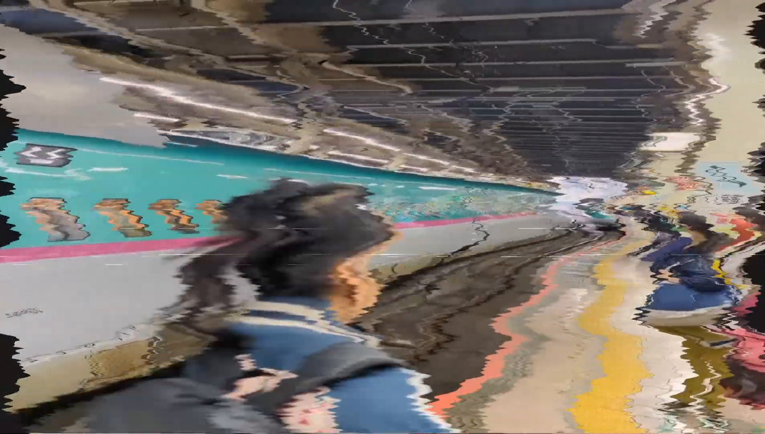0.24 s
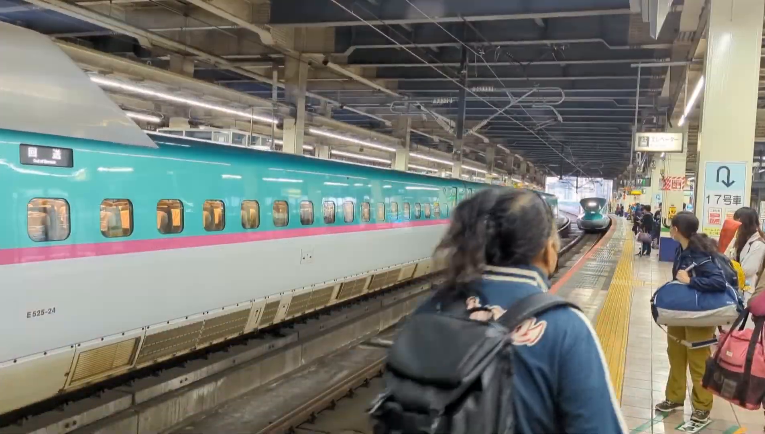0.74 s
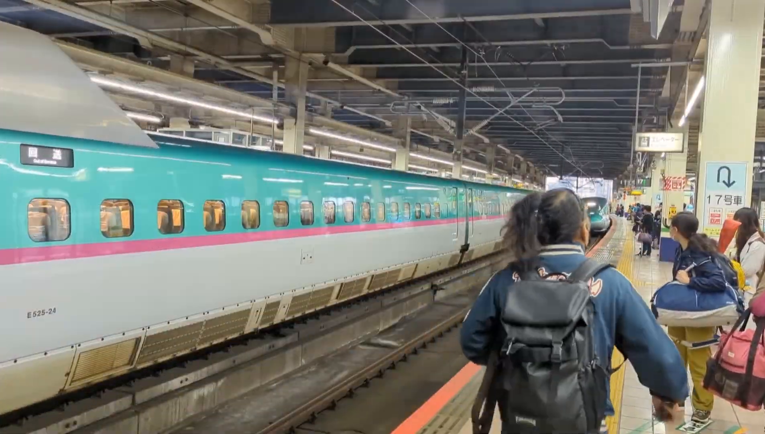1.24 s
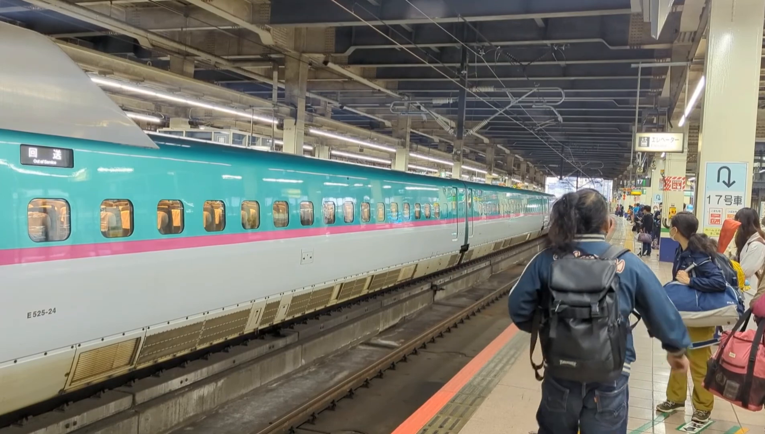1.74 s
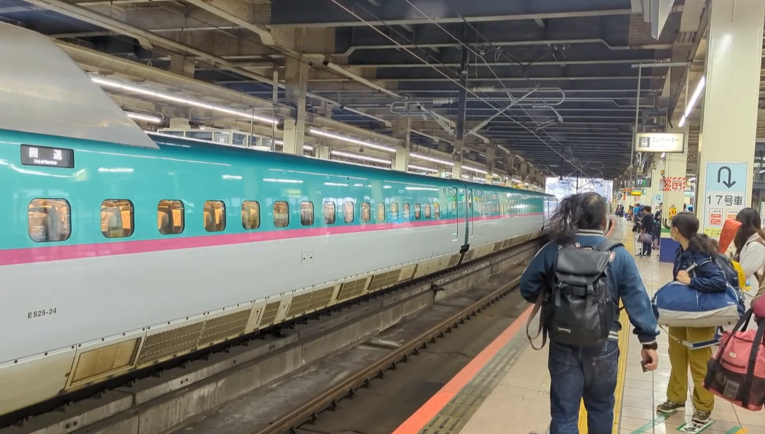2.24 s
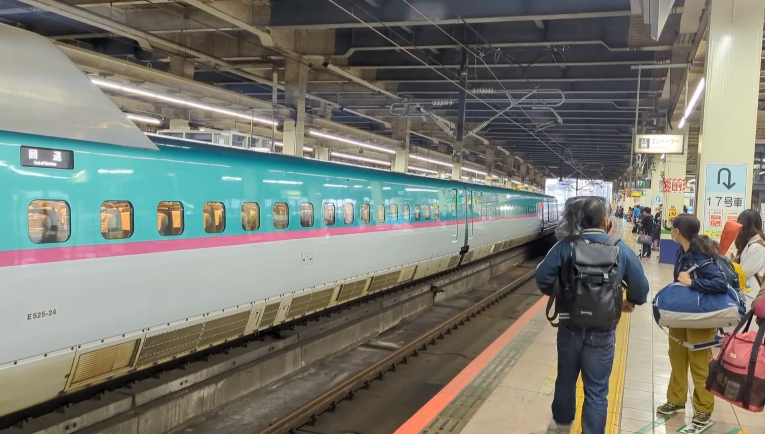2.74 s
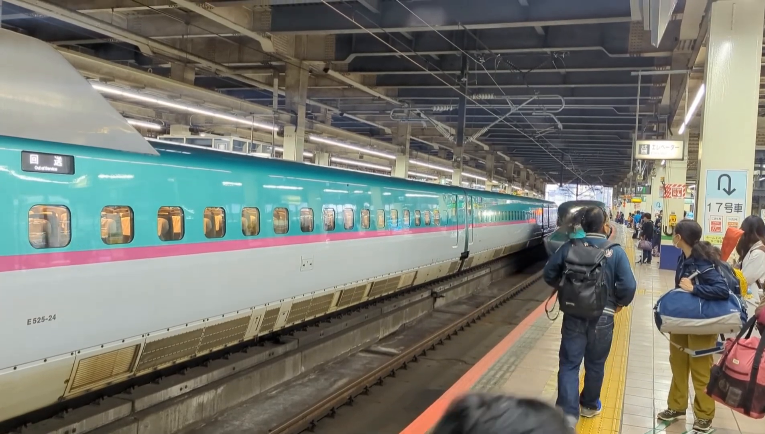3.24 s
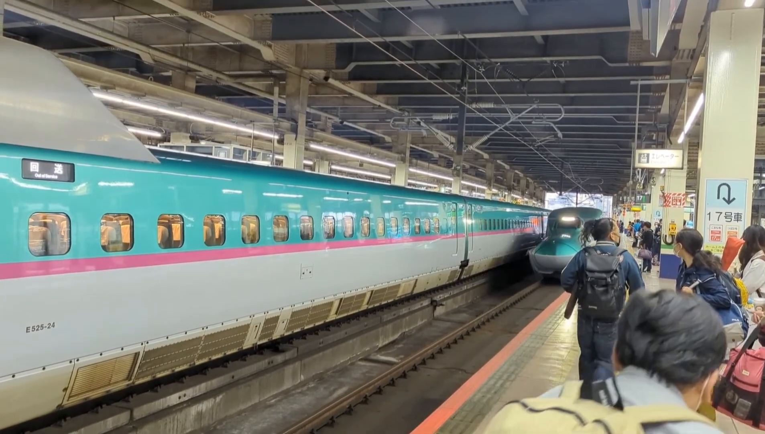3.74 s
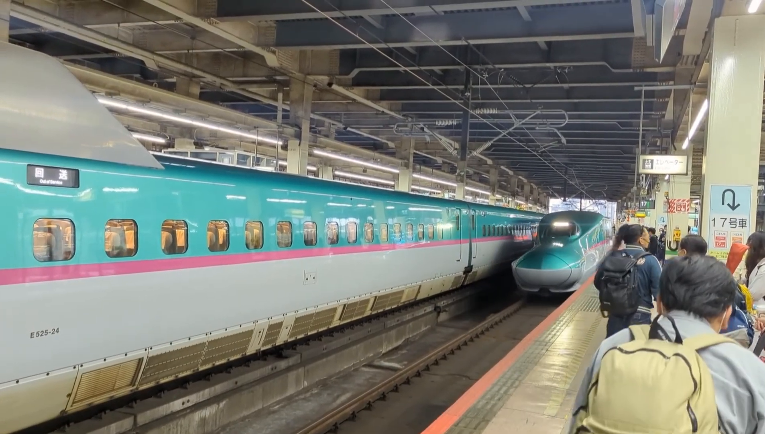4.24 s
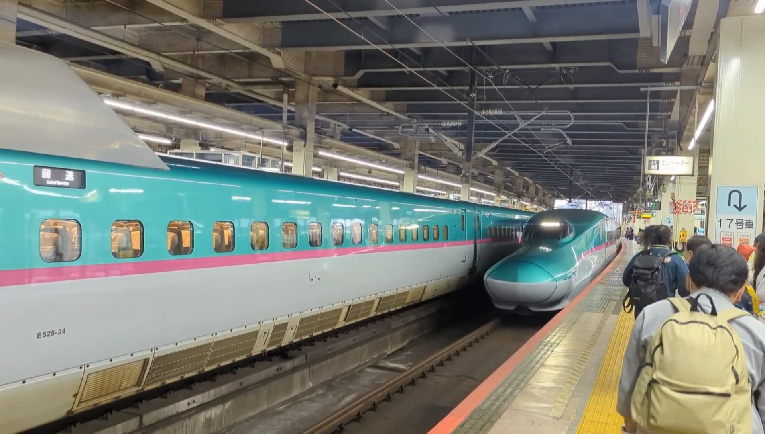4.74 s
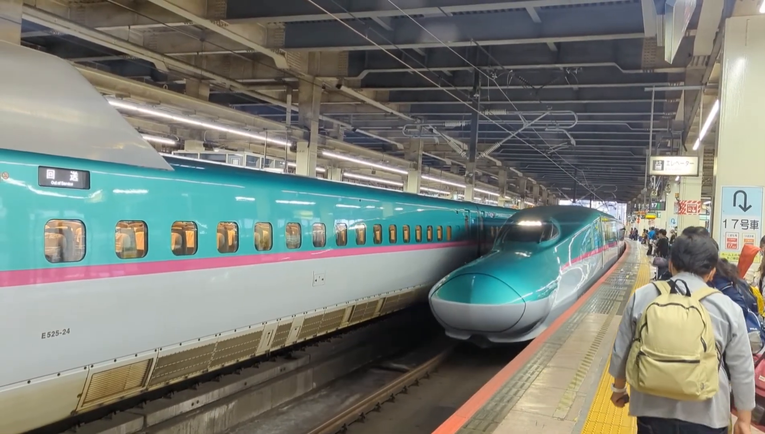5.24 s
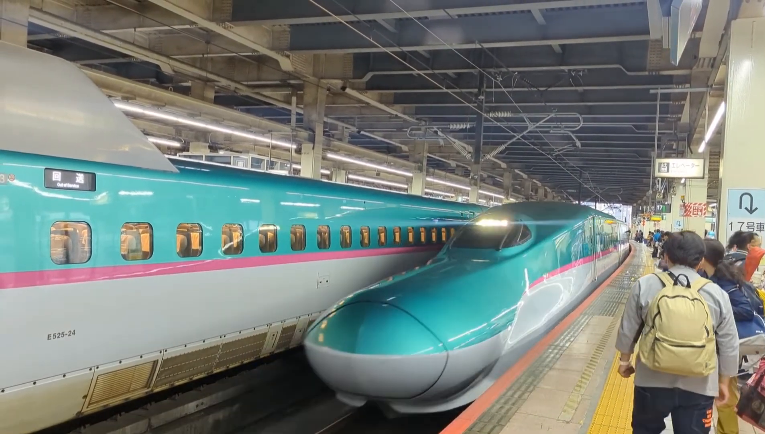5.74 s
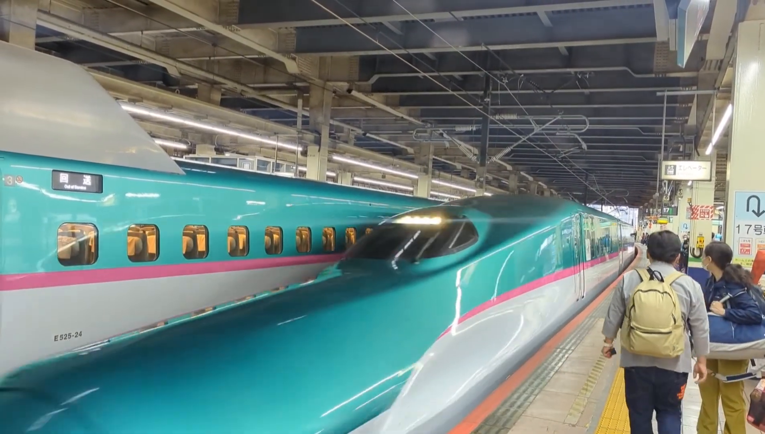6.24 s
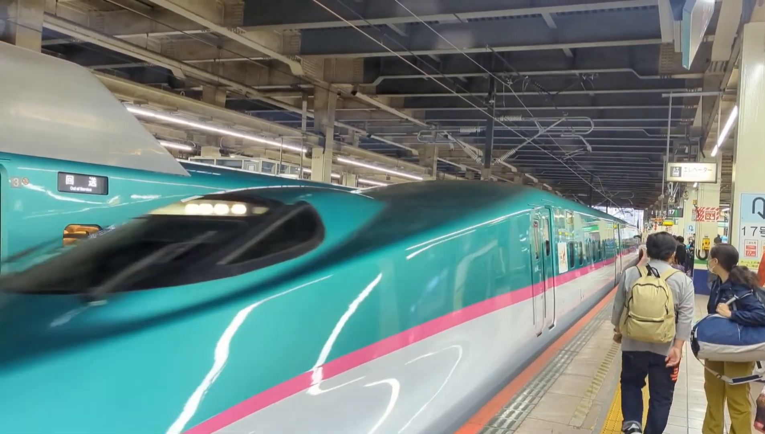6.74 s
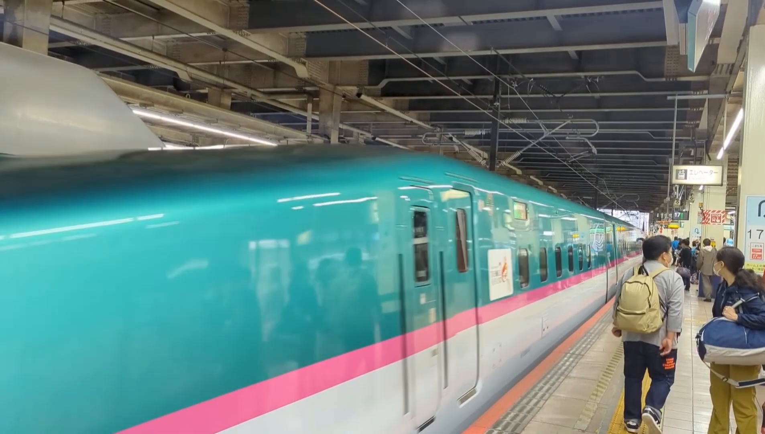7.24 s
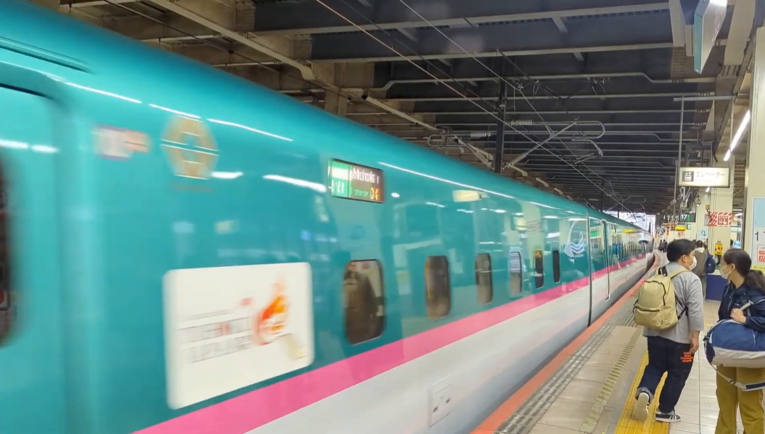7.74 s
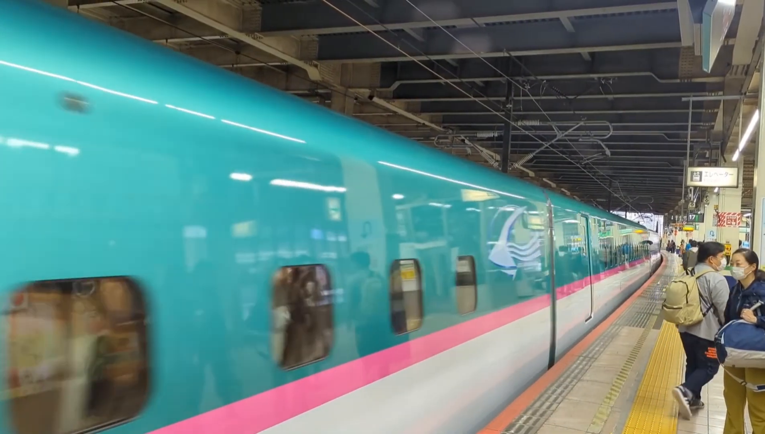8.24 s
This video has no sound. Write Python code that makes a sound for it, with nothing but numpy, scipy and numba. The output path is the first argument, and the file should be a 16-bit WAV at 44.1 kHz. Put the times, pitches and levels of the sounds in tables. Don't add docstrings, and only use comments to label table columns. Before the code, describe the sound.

Under a roofed station platform, low rumble and steady fan hum surround a faint high brake squeal. As an electric train approaches, the squeal grows into a piercing, rough shriek with glassy overtones, while a gear whine gradually sinks. A knock sounds early on. The rumble ducks under the squeal, air hiss rises, and the pitch drops slightly as the nose passes close to the stereo microphones.

```python
import sys
import numpy as np
from scipy import signal
from scipy.io import wavfile
from scipy.ndimage import uniform_filter1d, minimum_filter1d
from numba import njit

SR = 44100
rng = np.random.default_rng(int(sys.argv[2]) if len(sys.argv) > 2 else 0)


def to_wav(sig):
    pcm = np.clip(np.atleast_2d(sig), -1, 1) * 32767
    pcm = np.round(pcm).astype(np.int16)
    wavfile.write(sys.argv[1], SR, pcm.T)


def boost(x):
    u = np.asarray(x, float) / 20
    return 10 ** u


N = 374409
TIME = np.arange(N) / SR
STEADY = slice(SR, 3 * SR)
FULL_EFFORT_DB = -14


@njit
def svf(x, hz, width, order):
    y, band, low = np.empty(len(x)), np.zeros(order), np.zeros(order)
    g, k, h = 0., 0., 0.
    for i in range(len(x)):
        if i % 16 == 0:
            g = np.tan(np.pi * hz[i] / SR)
            k = width[i] / hz[i]
            h = 1 / (1 + g * (g + k))
        u = x[i]
        for j in range(order):
            v = (band[j] + g * (u - low[j])) * h
            band[j] = 2 * v - band[j]
            low[j] += 2 * g * v
            u = k * v
        y[i] = u
    return y


def curves(table):
    s, *columns = np.transpose(table)
    return [np.interp(TIME, s, column) for column in columns]


def step(s, spread):
    return 1 / (1 + np.exp((s - TIME) / spread))


def walk(rate):
    hold = int(SR / rate)
    levels = np.repeat(rng.standard_normal(N // hold + 1), hold)
    return 1.55 * uniform_filter1d(uniform_filter1d(levels, hold), hold)[:N]


def ring(hz, width, order):
    hz, width = hz + 0 * TIME, np.maximum(width + 0 * TIME, 2)
    y = svf(rng.standard_normal(N), hz, width, order) / np.sqrt(width)
    return y / np.std(y)


def likeness(hz):
    # frequency in Hz, left-right correlation.
    coherence = np.array([(60, 1), (130, 0.97), (290, 0.94), (640, 0.54), (1410, -0.13), (3100, -0.026),
                          (6820, 0.031), (15000, 0.19)])
    return np.interp(np.log(hz), np.log(coherence[:, 0]), coherence[:, 1])


def pair(hz, width, pan_db, like, order=2):
    like = np.clip(like, -.99, .995)
    mid = np.sqrt((1 + like) / 2) * ring(hz, width, order)
    side = np.sqrt((1 - like) / 2) * ring(hz, width, order)
    return np.array([(mid + side) * boost(pan_db / 2), (mid - side) * boost(-pan_db / 2)])


def effort():
    # time in s, main squeal in dB.
    braking = [(0, -39.5), (.25, -38), (.55, -31.5), (1.2, -29), (1.6, -25.5), (2, -22), (2.6, -19),
               (3.2, -18.5), (3.8, -15.5), (4.3, -13), (5.5, -14.5), (6.7, -13.5), (7.4, -14.5),
               (7.8, -13.5), (8.3, -14.5), (8.49, -16.5)]
    return curves(braking)[0] - FULL_EFFORT_DB


def brakes():
    # ratio to main squeal, core width in Hz, skirt centre in Hz, skirt width in Hz,
    # skirt level in dB, left bias in dB.
    disc_modes = [
        (1., 312, 6200, 790, -3, 0),
        (.501, 186, 3072, 890, -2, 5.5),
        (1.507, 270, 9130, 3700, 2.5, 3.5),
        (2.005, 230, 12350, 2500, -3, 1),
    ]
    # dB at full effort, dB per dB of effort, dB gained up close, closes in at s.
    overtones = [
        (-14.5, -0.33, 4.5, 6.2),
        (-33, -0.5, 6.5, 4.5),
        (-25.5, -0.3, 6.5, 4.44),
    ]
    # frequency in Hz, width in Hz, dB under the main squeal.
    lone_discs = [(6237, 14, -11), (6305, 30, -11), (6360, 18, -9), (6415, 25, -13)]
    # frequency in Hz, width in Hz, dB under the main squeal, fades at s.
    far_shoulder = (6720, 330, -20.5, 4)
    # ratio to main squeal, width in Hz, level in dB over the double mode.
    top_mode = (2.47, 400, -12)

    hz = 6355 - 11 * TIME - 185 * step(6.45, .33)
    pan_db = -3 + 3.5 * step(6.36, 0.087)
    drive_db = effort()
    over_db = [db + share * drive_db + near_db * step(s, 0.38) for db, share, near_db, s in overtones]
    main_db = FULL_EFFORT_DB + drive_db + 3.5

    out = sum(boost(db) * pair(f, width, pan_db, 0.046) for f, width, db in lone_discs)
    out = out * boost(main_db) * (1 - step(2.3, 0.76))
    for (ratio, core, skirt_hz, skirt, skirt_db, bias_db), db in zip(disc_modes, [0] + over_db):
        is_main = ratio < 1.2
        pan = bias_db + pan_db * is_main
        far = (ratio > 1.9) * (1 - step(2.7, .5))
        near_discs = pair(ratio * hz + 170 * far, core + 250 * far, pan, 0.04, order=3)
        other_discs = boost(skirt_db) * pair(skirt_hz, skirt, pan, .08, order=5)
        mode = (near_discs + other_discs) / np.sqrt(1 + boost(2 * skirt_db))
        flicker_db = (0.3 if is_main else 1.5) * walk(12)
        out = out + boost(main_db + db + flicker_db - 4 * far) * mode

    f, width, db, s = far_shoulder
    out = out + boost(main_db + db) * (1 - step(s, 0.94)) * pair(f, width, pan_db, .05, order=3)
    ratio, width, db = top_mode
    top_db = main_db + over_db[-1] + db + 3.3 * walk(9)
    return out + boost(top_db) * step(5.44, 0.085) * pair(ratio * hz, width, 0, 0.17)


def pad():
    hz = 12350 - 13 * TIME + 150 * step(6.65, 0.18)
    width = 45 + 265 * step(5.8, .8)
    wheel_hz, slowing_hz_per_s, first_squeak_s = 5.45, .24, .1
    turn = wheel_hz * (TIME - first_squeak_s) - slowing_hz_per_s * TIME ** 2 / 2
    swell_db = 5.9 * np.cos(2 * np.pi * turn) * (1 - step(6.2, 1.2))
    return boost(-39.5 + .62 * effort() + swell_db) * pair(hz, width, 1.0, 0.28)


def mesh_levels(gain_db):
    mesh_db = [-36, -50, -46, -49]
    # time in s, length in s, rise in dB.
    mesh_swells = [
        [(0, .4, -8), (.8, .3, 4), (1.6, .4, 4), (2.3, .3, 3), (3.3, 0.37, 2.5), (3.93, 0.14, 15.5),
         (4.35, 0.21, 6), (5, 0.16, 7), (5.4, .4, 3), (6.1, .3, 7), (6.8, 0.4, 6), (7.85, .5, 9)],
        [(2.1, 0.27, 11), (8, .4, 10)],
        [(1.85, .12, 13), (2.7, 0.21, 8), (3.1, .3, 12), (3.6, .35, 13), (4.5, 0.43, 7), (5.1, 0.42, 8),
         (6.35, 0.25, 12), (7.9, 0.78, 15.5)],
        [(4.4, 0.16, 10), (5, 0.26, 16), (5.43, .08, 6), (5.65, .35, 17), (6.35, 0.35, 16), (7.1, 0.4, 14),
         (8.49, .2, 8)],
    ]
    levels = []
    for db, swells in zip(mesh_db, mesh_swells):
        rise = sum(rise_db * np.exp(-((TIME - s) / length) ** 2) for s, length, rise_db in swells)
        levels.append(db + gain_db + rise)
    return levels


def gears(gain_db):
    mesh_hz = 748 - 37.8 * TIME
    turns = np.cumsum(mesh_hz * (1 + .004 * walk(5))) / SR
    out = 0
    for k, db in enumerate(mesh_levels(gain_db)):
        like = likeness(600. * (k + 1))
        lag = np.arccos(like) * np.array([[.5], [-.5]])
        beads = boost(-2 + 3 * walk(12))
        line = beads * np.sqrt(2) * np.sin(2 * np.pi * (k + 1) * turns + lag)
        blur = pair((k + 1) * mesh_hz, 30. + 14. * k, 0.1, like)
        out = out + boost(db - 3) * (line + blur)
    return out


def hall(bass_db, middle_db, hiss_db):
    # frequency in Hz, spectral density in dB per Hz.
    spectrum = np.array([(30, -49), (45, -26), (70, 3), (110, -1.5), (190, -3), (400, -5.5), (684, -9.5),
                         (1000, -13.5), (2000, -17), (2800, -26), (4000, -31.5), (5500, -35), (8000, -40.5),
                         (11000, -36.5), (14000, -49.5)])
    moves = [db - db[STEADY].mean() for db in (bass_db, middle_db, hiss_db)]
    swell = walk(6)
    out = 0
    for hz in 32 * 2 ** np.arange(0, 9, .5):
        place = np.interp(np.log(hz), np.log([150, 900, 4500]), np.arange(3))
        move = sum(max(1 - abs(place - k), 0) * db for k, db in enumerate(moves))
        db = np.interp(np.log(hz), np.log(spectrum[:, 0]), spectrum[:, 1]) + 10 * np.log10(hz)
        level = boost(db + move + 0.3 * swell + 0.81 * walk(10))
        out = out + level * pair(hz, 0.73 * hz, 1.7 * (hz > 800), likeness(hz), order=3)
    return out * boost(-19) / np.std(out[:, STEADY])


def fans(middle_db):
    # frequency in Hz, width in Hz, level in dB.
    blade_lines = [(99.7, 14, -39.5), (196.8, 10, -36.5), (293.8, 10.5, -44), (440.5, 19, -37),
                   (1190, 8.5, -42), (1320, 16, -43), (1648, 76, -37.5)]
    seen_db = middle_db - middle_db[STEADY].mean() - 6 * step(6.5, 0.24)
    lines = sum(boost(db) * pair(hz, width, 0.1, likeness(hz)) for hz, width, db in blade_lines)
    return boost(seen_db) * lines


def knocks():
    # start in s, level in dB, frequency in Hz, t60 in s.
    joints = [
        (.45, -32, 198, .5),
        (2.75, -21, 780, 0.51),
        (2.95, -30.5, 398, .6),
        (8.37, -19, 216, 0.18),
        (8.37, -22, 432, 0.18),
    ]
    # start in s, peak in dB.
    ticks = [
        (7.085, -42),
        (7.218, -39.5),
        (7.3094, -36),
    ]
    out = np.zeros((2, N))
    for s, db, hz, t60 in joints + [(s, db, 13200, .05) for s, db in ticks]:
        age = np.maximum(TIME - s, 0)
        shape = (1 - np.exp(-age / 0.0024)) * np.exp(-np.log(1000) * age / t60)
        out += boost(db) * shape * pair(hz, 0.16 * hz, 0.1, likeness(hz))
    return out


def scene():
    # time in s, level in dB.
    rumble = [(0, -30.5), (.15, -29.5), (.45, -25.5), (.75, -23.5), (1.3, -23), (1.8, -22.5), (2.6, -22.5),
              (3.1, -22.5), (3.5, -22), (4.1, -23), (4.55, -22), (4.85, -26.5), (5.5, -27.5), (6.1, -31),
              (6.35, -29), (7.3, -27), (7.95, -26), (8.49, -28)]
    gain_db = curves(rumble)[0]
    gain_db = gain_db - gain_db[STEADY].mean()
    middle_db = 0.95 * gain_db + 3 * step(8.04, 0.18)
    hiss_db = 0.9 * gain_db + 10.5 * step(4.6, 0.61)
    train = brakes() + pad() + gears(gain_db)
    return train + hall(gain_db, middle_db, hiss_db) + fans(middle_db) + knocks()


def low_pass(x):
    return signal.sosfilt(signal.butter(12, 15730, fs=SR, output="sos"), x)


def record(dry):
    ceiling, size = 0.92, int(0.0073 * SR)
    gain = np.minimum(ceiling / np.maximum(np.abs(dry).max(axis=0), 1e-9), 1)
    gain = uniform_filter1d(minimum_filter1d(gain, size=2 * size + 1), size=size)
    return low_pass(dry * gain)


dry = scene()
out = record(dry)
to_wav(out)
```